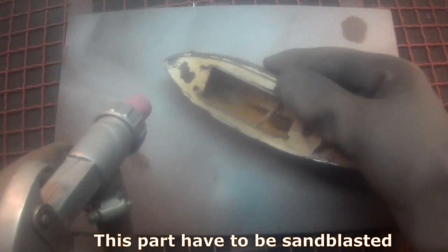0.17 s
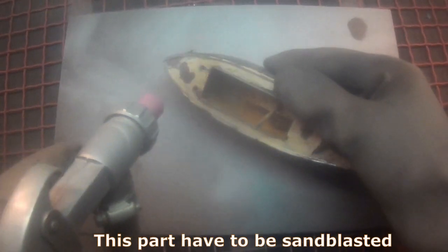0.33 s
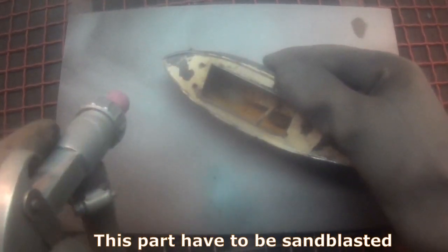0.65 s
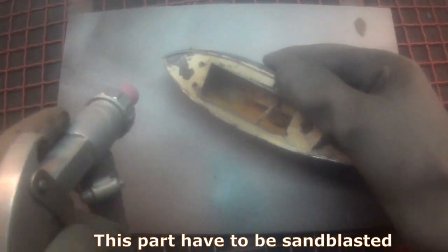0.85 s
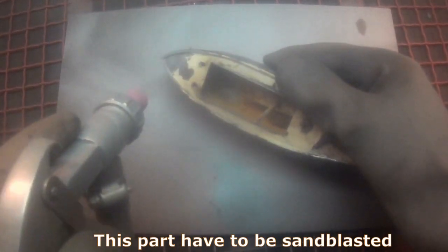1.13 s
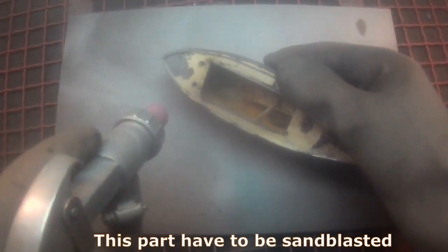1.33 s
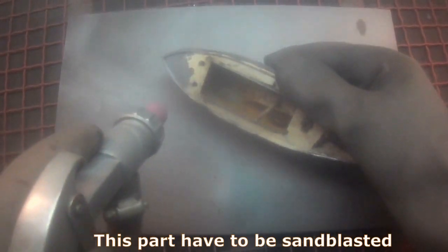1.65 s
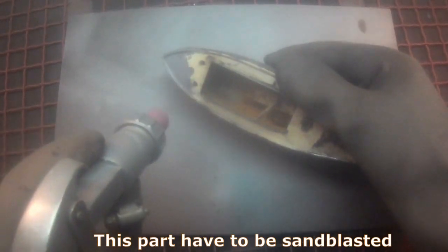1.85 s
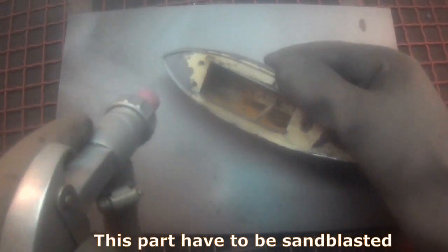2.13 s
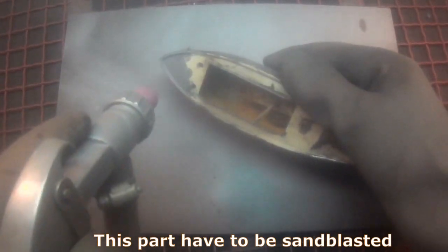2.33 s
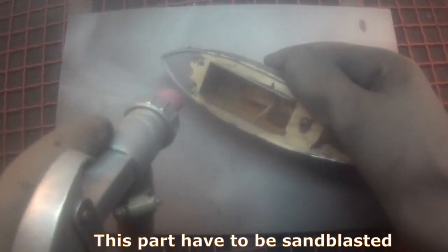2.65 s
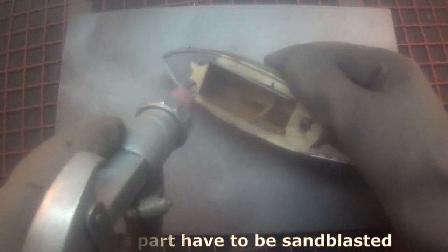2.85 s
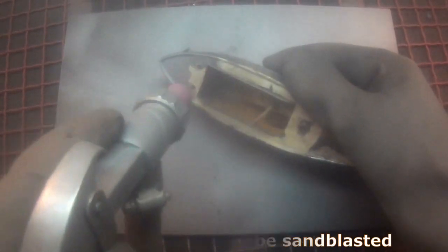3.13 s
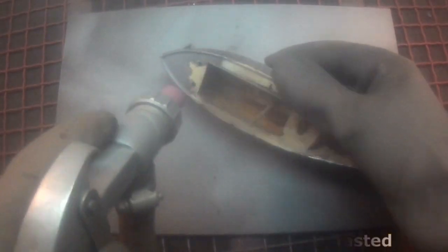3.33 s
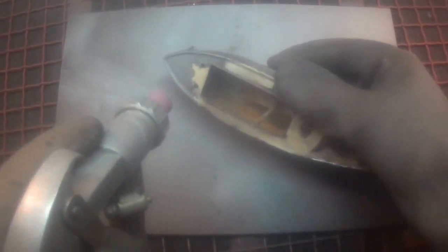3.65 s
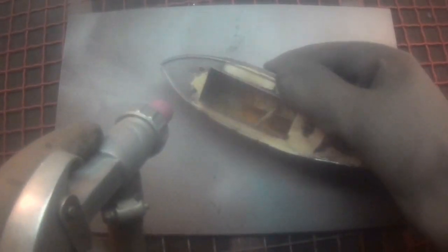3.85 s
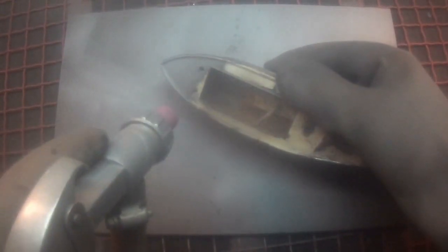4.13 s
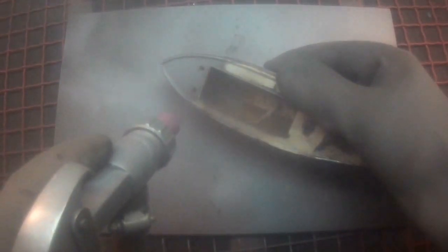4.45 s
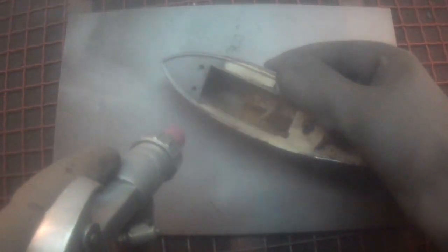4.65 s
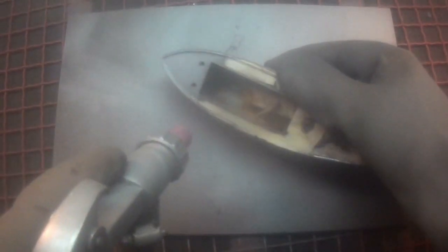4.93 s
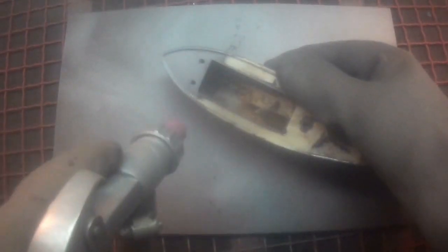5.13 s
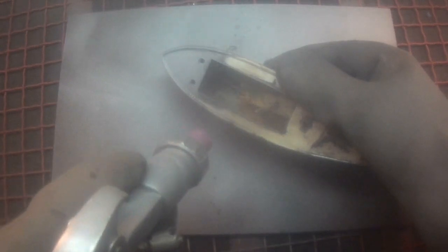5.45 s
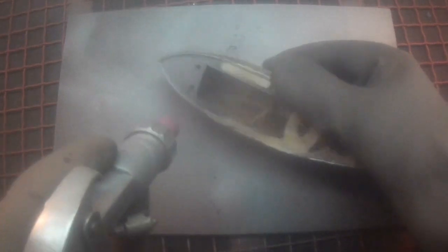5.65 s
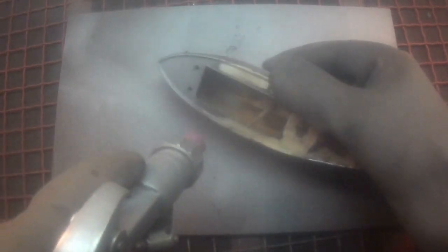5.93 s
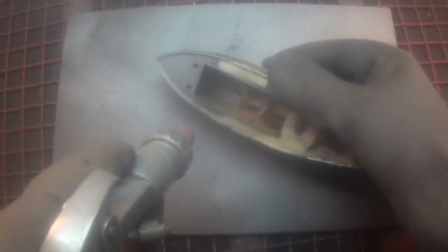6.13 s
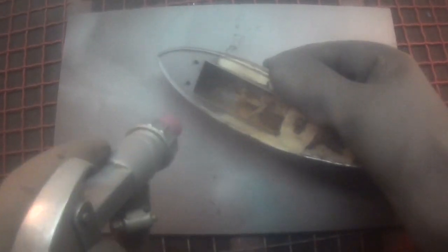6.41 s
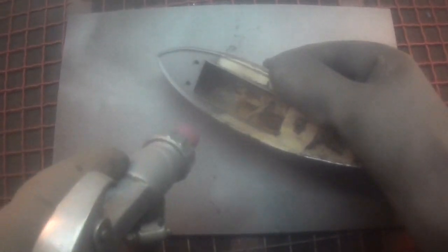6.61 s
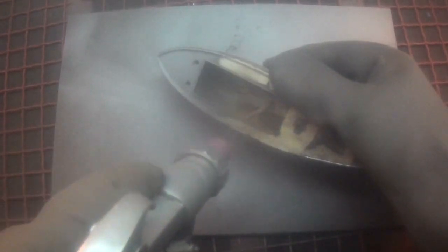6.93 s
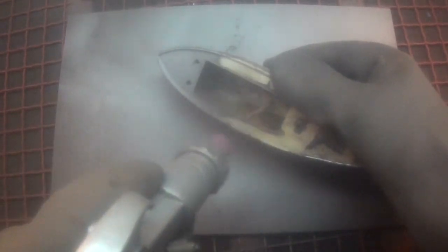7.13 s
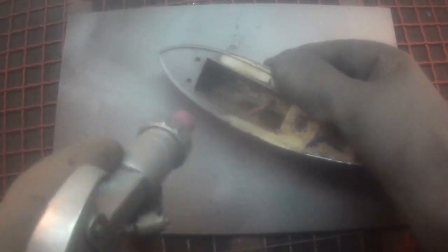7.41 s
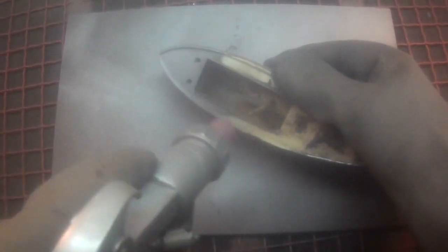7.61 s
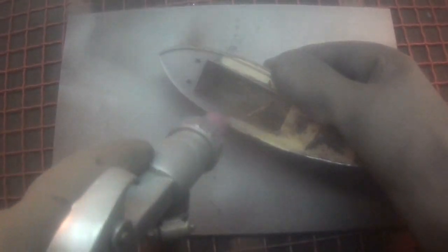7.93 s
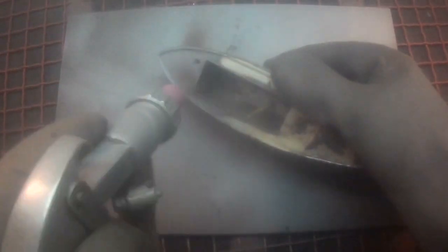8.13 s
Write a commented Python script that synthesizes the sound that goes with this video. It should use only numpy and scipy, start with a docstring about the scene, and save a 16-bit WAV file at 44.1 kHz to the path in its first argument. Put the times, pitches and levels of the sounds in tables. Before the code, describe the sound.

After faint spits of air, a rasping abrasive jet starts and stops repeatedly inside a closed metal cabinet, making a thin metal shell ring and rattle.

```python
"""A thin leak of air spits, then a hissing jet bursts out again and again, rattling and ringing metal close by.
A sandblasting gun strips a small metal hull in a closed cabinet: turbulent air and grain clicks, shaped by the
trigger valve, excite the resonances of hull and cabinet, shared out by the wandering aim. Each throw of the
valve thumps the cabinet's low modes; handling knocks on it. A low rumble and faint whistles, present from the
first opening on, and workshop noise fill the gaps. The sound is mono."""
import sys
import numpy as np
from scipy import signal
from scipy.fft import rfft, irfft, next_fast_len
from scipy.io import wavfile

SR = 44100
rng = np.random.default_rng(int(sys.argv[2]) if len(sys.argv) > 2 else 0)


def wrap_up_sound(samples):
    """Save the sound to the file named by the first command line argument, as 16-bit audio."""
    columns = np.atleast_2d(samples).T
    # keep every value between -1 and 1, then stretch to whole-number steps
    tamed = np.clip(columns, -1, 1)
    steps = np.round(tamed * 32767).astype(np.int16)
    wavfile.write(sys.argv[1], SR, steps)


N = 364707
TIME = np.arange(N) / SR
FREQS = np.fft.rfftfreq(8192, 1 / SR)  # frequency grid of all filters, Hz


def gain_of(db):
    """Logarithmic level: decibels become an amplitude ratio."""
    return 10 ** (np.asarray(db) / 20)


def evened(x):
    """Normalisation: scales a signal to an rms of one."""
    return x / np.sqrt(np.mean(x ** 2) + 1e-20)


def decay(t, t60):
    """Exponential damping: falls by 60 dB in t60 seconds."""
    return np.exp(-np.log(1000) * t / t60)


def add(mix, start_s, sound):
    """Superposition: sums a sound into the mix from a given time."""
    part = mix[max(round(start_s * SR), 0):][:len(sound)]
    part += sound[:len(part)]


def slow_chance(top_hz):
    """Band-limited noise: a random wobble of rms one, no faster than top_hz."""
    size = next_fast_len(N)
    keep = np.fft.rfftfreq(size, 1 / SR) < top_hz
    noise_bins = rfft(rng.standard_normal(size))
    return evened(irfft(noise_bins * keep, size)[:N])


def curve(points):
    """Linear interpolation: a (time, value) table becomes a continuous course."""
    return np.interp(TIME, *np.transpose(points))


def spectrum(points):
    """Spectral envelope: gain per frequency, interpolated in dB over log frequency."""
    hz, db = np.transpose(points)
    return gain_of(np.interp(np.log(FREQS + 1), np.log(hz), db))


def resonances(modes):
    """Modal response: the powers of steep-sided resonance peaks add up."""
    power = 0
    for hz, width_hz, db in modes:
        peak = gain_of(db) / (1 + (2 * (FREQS - hz) / width_hz) ** 2)
        power = power + peak ** 2
    return np.sqrt(power)


def ring(x, gain):
    """Minimum phase: a causal filter of unit energy, so that resonances ring on after their cause."""
    log_gain = np.log(np.maximum(gain / gain.max(), 1e-5))
    circle = np.concatenate([log_gain, log_gain[-2:0:-1]])
    # the Hilbert transform of the log gain supplies the minimum phase
    response = np.exp(np.conj(signal.hilbert(circle)))[:len(gain)]
    taps = irfft(response)[:len(gain)]
    return signal.oaconvolve(x, taps / np.linalg.norm(taps))[:N]


def muffle(x, top_hz, order):
    """Low-pass filtering: attenuates everything above top_hz."""
    return signal.sosfilt(signal.butter(order, top_hz, fs=SR, output="sos"), x)


# workshop noise spectrum: pitch_hz [Hz], level_db [relative dB per Hz]
ROOM_SPECTRUM = [(20, -0.5), (60, -7), (160, -5), (260, -10.5), (700, -14.5), (2600, -24.5), (5000, -33),
                 (15000, -44)]
# low rumble, spectrum: pitch_hz [Hz], level_db [relative dB per Hz]
RUMBLE_SPECTRUM = [(20, 0), (70, -15), (120, -1), (165, 5), (230, -6.5), (320, -6), (600, -12),
                   (1500, -31)]
# course of that rumble: time_s [s], level_db [dB]
RUMBLE_LEVEL = [(0.2,-75),(1.1,-75.5),(1.45,-82),(1.95,-75.5),(2.65,-82),(3.4,-76),(4.3,-92),(5.2,-78),(6.1,-79),(6.8,-91),(7.25,-77),(8.2,-88)]
# whistles of the leaking valve: pitch_hz [Hz], level_db [dB, mean of a random wobble]
LEAK_WHISTLES = [(2396, -98.5), (4258, -92), (4770, -101), (8312, -95.5), (11999, -99)]


def background(room_db=-80, waver_hz=12, unsteady_db=3):
    """Stationary noise and frequency modulation: workshop, low rumble and wavering valve whistles."""
    room = gain_of(room_db) * ring(rng.standard_normal(N), spectrum(ROOM_SPECTRUM))
    rumble = gain_of(curve(RUMBLE_LEVEL)) * ring(rng.standard_normal(N), spectrum(RUMBLE_SPECTRUM))
    drift = np.cumsum(waver_hz * slow_chance(60)) / SR  # cycles, common to all whistles
    leak = np.zeros(N)
    for hz, db in LEAK_WHISTLES:
        level = gain_of(db + unsteady_db * slow_chance(2))
        leak += level * np.sin(2 * np.pi * (hz * TIME + drift))
    first_opening = VALVE_SPANS[0][0]
    return room + (rumble + leak) * (TIME > first_opening)


# dull knocks of gun and hull being handled: start_s [s], level_db [relative dB]
HANDLING_KNOCKS = [(0.329, -66), (0.774, -55), (1.878, -64), (2.029, -54), (2.149, -51.5), (2.996, -48),
                   (3.558, -52), (3.829, -55.5), (4.946, -49.5), (5.191, -52.5), (5.329, -59), (5.44, -60),
                   (6.141, -47.5), (6.247, -52.5), (7.234, -63), (7.342, -51.5), (7.552, -45),
                   (7.638, -51.5)]


def knocks(rattle_db=-8, swell_s=.012, lead_s=0.0087, push_db=-8, top_hz=200):
    """Impact excitation: a soft push and a short rattle set the cabinet booming."""
    t = np.arange(SR // 4) / SR
    rattle, push = np.zeros(N), np.zeros(N)
    push_wave = np.exp(-t / swell_s) * np.sin(2 * np.pi * CABINET_MODES[1][0] * t)
    for start_s, level_db in HANDLING_KNOCKS:
        # the rattle swells to its peak after swell_s, then dies away
        add(rattle, start_s - lead_s, gain_of(level_db) * t / swell_s * np.exp(1 - t / swell_s))
        add(push, start_s, gain_of(level_db + push_db) * push_wave)
    boom = resonances([(80, 91, -8), (136, 24, -2), (164, 43, -1.0), (288, 92, -12), (533, 330, -22.5)])
    booming = ring(rattle * rng.standard_normal(N), boom)
    return gain_of(rattle_db) * booming + muffle(push, top_hz, order=4)


# low modes of the cabinet: pitch_hz [Hz], level_db [relative dB], t60_s [s]
CABINET_MODES = [(51.6,-11,0.5),(71.3,1,.16),(106.7,-6.5,0.17),(136,-6,0.37),(172.5,16,0.12)]


def thumps(open_db=-56, shut_db=-57.0, top_hz=124, lead_s=0.0033,
           shudder_db=-10, shudder_t60=0.32, shudder_top_hz=195):
    """Modal impulse response: opening pushes the cabinet's air, shutting pulls; hose and panels shudder."""
    t = np.arange(SR // 2) / SR
    thump = sum(gain_of(db) * decay(t, t60) * np.cos(2 * np.pi * hz * t) for hz, db, t60 in CABINET_MODES)
    air, shake = np.zeros(N), np.zeros(N)
    for opens, shuts, _ in VALVE_SPANS:
        for start_s, push in (opens, gain_of(open_db)), (shuts, -gain_of(shut_db)):
            add(air, start_s - lead_s, push * thump)
            add(shake, start_s - lead_s, abs(push) * decay(t, shudder_t60))
    shudder_modes = resonances([(40, 65, 0.5), (90, 47, -5.5), (156, 52, 2)])
    shudder = gain_of(shudder_db) * ring(shake * rng.standard_normal(N), shudder_modes)
    return muffle(air, top_hz, order=6) + muffle(shudder, shudder_top_hz, order=6)


def grit(flow, grains_per_s=7000, share=0.48):
    """Shot noise: clicks of single grains, mixed by power with turbulent air."""
    clicks = rng.standard_normal(N) * (rng.random(N) < grains_per_s / SR)
    share = np.clip(share, 0, 1)
    return flow * (np.sqrt(share) * evened(clicks) + np.sqrt(1 - share) * rng.standard_normal(N))


# squeezes of the trigger: start_s (valve opens) [s], end_s (valve shuts) [s], level_db (air pressure) [dB]
VALVE_SPANS = [(0.208, 0.594, 2), (0.683, 0.863, 3), (0.929, 1.143, 2.3), (1.184, 1.601, 1.8),
               (1.661, 2.019, 1.5), (2.093, 2.306, 0.8), (2.371, 2.997, -0.7), (3.071, 3.43, -0.5),
               (3.509, 3.682, -0.5), (3.77, 4.726, -0.95), (4.801, 5.019, -0.5), (5.105, 5.724, -0.2),
               (5.791, 6.032, -0.26), (6.095, 6.282, 0.5), (6.381, 7.393, -0.13), (7.474, 7.724, -1.8),
               (7.782, 8.122, -3.5), (8.218, 8.301, -1.5)]
SURGE_DB, SURGE_S = 1.5, 0.053  # pressure stored in the hose gives each blast a stronger start


def airflow(spans, rise_s=0.0042, fall_t60=0.037):
    """Pressure discharge: a fast rise with a surge settles, then bleeds out once the valve shuts."""
    flow = np.zeros(N)
    for opens, shuts, pressure_db in spans:
        length = shuts - opens
        t = np.arange(0, length + 2 * fall_t60, 1 / SR)
        pressure = gain_of(pressure_db + SURGE_DB * np.exp(-t / SURGE_S))
        bleed = decay(np.maximum(t - length, 0), fall_t60)
        add(flow, opens, pressure * np.minimum(t / rise_s, 1) * bleed)
    return flow


# small spits of air before the first blast: start_s [s], end_s [s], level_db [dB, before the surge]
AIR_SPITS = [(0.034,.056,-78),(.069,.097,-82),(.135,.175,-78.5)]


def spits():
    """Leakage flow: a little air sounds the hull before the trigger is fully pressed."""
    hull = resonances([(2400, 670, 2.5), (3500, 500, -3), (6640, 1500, -15)])
    return ring(grit(airflow(AIR_SPITS)), hull + gain_of(-21) * spectrum(JET_SPECTRUM))


# short gulps of grit: start_s [s], end_s [s], level_db [dB, before the surge]
GRIT_GULPS = [(0.685,.74,-59),(1.11,1.145,-64)]


def gulps():
    """Burst excitation: a clump of grit leaves the nozzle and sounds the panels."""
    return ring(grit(airflow(GRIT_GULPS)), resonances(PANEL_MODES))


# resonances the jet catches only from certain angles:
# start_s [s], end_s [s], pitch_hz [Hz], width_hz [Hz], level_db [dB, before flow and wobble]
CAUGHT_MODES = [(0.031,1.35,518,94,-79),(1.5,2.23,516,56,-79),(2.67,3.63,513,110,-78.5),(6.91,7.9,1130,59,-66),(1.4,2.3,8480,330,-64),(3.7,4.7,7000,300,-58),
                (4.4,6.8,3570,97,-54.5),(6.5,8.2,6700,150,-58),(6.8,8,2740,180,-48),(6.8,9,3700,110,-55.5),(4.42,8.3,2635,62,-50),(0.42,1.8,2635,94,-60.5)]


def caught(flow, fade_s=0.26, patchy_db=2.4, patchy_hz=9):
    """Selective excitation: single modes swell, waver and sink as the jet sweeps over spots that feed them."""
    out = np.zeros(N)
    for start_s, end_s, hz, width_hz, db in CAUGHT_MODES:
        fade = np.clip(np.minimum(TIME - start_s, end_s - TIME) / fade_s, 0, 1)
        swell = fade * gain_of(db + patchy_db * slow_chance(patchy_hz))
        out += ring(flow * swell * rng.standard_normal(N), resonances([(hz, width_hz, 0)]))
    return out


def afterring(x, db=-27, t60=0.15, top_hz=4000):
    """Reverberation: the steel walls hold a faint, dull tail after each blast."""
    t = np.arange(SR // 4) / SR
    tail = rng.standard_normal(len(t)) * decay(t, t60)
    tail = muffle(tail / np.linalg.norm(tail), top_hz, order=1)
    return gain_of(db) * signal.oaconvolve(x, tail)[:N]


def echoes(t60):
    """Diffuse reflection: frequency response of a dense cluster of short echoes."""
    t = np.arange(len(FREQS)) / SR
    taps = rng.standard_normal(len(t)) * decay(t, t60)
    return rfft(taps / np.linalg.norm(taps), 2 * len(t) - 2)


# hiss of the nozzle: pitch_hz [Hz], level_db [relative dB per Hz]
JET_SPECTRUM = [(300,-40),(700,-39),(3000,-12.5),(4500,-6.5),(6800,-3.5),(7050,-4.5),(7300,-0.5),(7700,-2.5),(8500,-4),(8800,-10),(10900,-3),(12400,-2),(14300,-2.5),(15200,-17)]


def nozzle(x, wall_db=-9, wall_t60=0.054, hand_db=-9, hand_t60=0.0069, count=9):
    """Comb filtering: wall reflections of the hiss stay put, those off hull and glove shift as they move."""
    walls = 1 + gain_of(wall_db) * echoes(wall_t60)
    place = np.linspace(0, count - 1, N)
    out = np.zeros(N)
    for k in range(count):  # crossfade through successive sets of nearby reflections
        nearness = np.cos(np.pi / 2 * np.minimum(abs(place - k), 1))
        comb = abs(walls + gain_of(hand_db) * echoes(hand_t60))
        out += ring(grit(x * nearness), spectrum(JET_SPECTRUM) * comb)
    return out


# how squarely the jet meets the hull as the hand moves: time_s [s], contact_db [dB]
AIM_CONTACT = [(0.205,-5.5),(0.23,-1.5),(0.3,-10.5),(0.48,-4),(0.7,-8),(0.98,-3),(1.04,-9),(1.68,-10),(1.79,0.5),(1.97,-1),(2.11,-4),(2.46,-4.5),(2.66,-1.4),
               (2.84,-1.5),(2.88,6),(3.24,-3.5),(3.3,4),(3.65,4.5),(3.8,-1),(3.94,-4.5),(3.98,2),(4.03,-5.5),(4.36,2),(4.45,-1.5),(4.62,-1.5),(4.68,3.5),(4.92,5),
               (5.29,1),(5.37,-2.5),(5.8,-3),(5.86,3.5),(6.26,2.5),(6.64,0),(7.03,-4.5),(7.07,4.5),(8.25,0.5)]
# what the spot under the jet feeds, at even contact:
# time_s [s], panels_db (cabinet) [dB], hollow_db (hull) [dB], rim_db (hull) [dB]
SPOT_LEVELS = [(0.23,-62,-44.5,-47),(0.95,-64.5,-46.5,-47.5),(1.35,-66.5,-45,-45.5),(1.85,-69.5,-47.5,-46.5),(2.3,-66,-46,-47.5),(3.53,-64,-44.5,-48.5),
               (3.86,-68,-46.5,-44),(4.9,-67.5,-45.5,-46.5),(6.6,-66.5,-48,-49.5),(7.25,-73.5,-46.5,-53),(7.4,-66.5,-43.5,-54.5),(8.11,-63.5,-41,-51.5),(8.25,-67.5,-43.5,-46)]
JET_DB = -49  # the free jet at even contact
JET_FOLLOWS, PANELS_FOLLOW = 0.24, 0.79  # dB per dB of contact; the hull follows it fully
TREMOR_DB, TREMOR_HZ = 1, 12  # the hand never holds the aim still


def excitation():
    """Coupling: gains of panels, hollow, rim and jet rise with contact; the spot shares out the ringing."""
    contact = curve(AIM_CONTACT) + TREMOR_DB * slow_chance(TREMOR_HZ)
    time_s, *levels = np.transpose(SPOT_LEVELS)
    panels, hollow, rim = (np.interp(TIME, time_s, db) for db in levels)
    jet = JET_DB + JET_FOLLOWS * contact
    return gain_of([panels + PANELS_FOLLOW * contact, hollow + contact, rim + contact, jet])


# resonances of cabinet panels, hull hollow and hull rim: pitch_hz [Hz], width_hz [Hz], level_db [relative dB]
PANEL_MODES = [(582,310,-17),(817.6,76,-5),(954,62,-4),(1112.5,49,-0.5),(1272,93,-3),(1432,40,-4.5),(1558,250,-5)]
HOLLOW_MODES = [(1794,108,-18),(1890,48,-8.5),(1954,103,-11.5),(2070,136,-7),(2240,236,-16),(2387,67,-8),(2466,115,-12),(2609,104,-1),(2747,120,-9),(2815,45,-10)]
RIM_MODES = [(3030, 133, -10.5), (3160, 150, -11), (3400, 110, -6.5), (3574, 99, -0.5), (3730, 70, -7),
             (4020, 160, -13), (4216, 200, -12), (4404, 66, -3), (4670, 260, -9), (5060, 140, -9.5),
             (5350, 106, -11.5), (5530, 56, -10.5), (5830, 120, -11), (6174, 330, -11.5), (6480, 260, -17),
             (6720, 85, -9.5)]


def blast(flow, flutter_db=-0.06, flutter_hz=45, bounce_db=0.45, bounce_hz=40):
    """Forced vibration: the unevenly fed jet hisses and drives panels, hollow and rim."""
    panels, hollow, rim, jet = excitation()
    feed = flow * gain_of(flutter_db * slow_chance(flutter_hz))
    impact = feed * gain_of(bounce_db * slow_chance(bounce_hz))  # the jet flaps across the hull's edge
    hiss = nozzle(feed * jet)
    hull = ring(grit(impact * hollow), resonances(HOLLOW_MODES))
    edge = ring(grit(impact * rim), resonances(RIM_MODES))
    box = ring(grit(feed * panels), resonances(PANEL_MODES))
    return hiss + hull + edge + box


def scene():
    """Superposition: every source reaches one microphone, heard alike in both channels."""
    flow = airflow(VALVE_SPANS)
    blasting = blast(flow) + caught(flow) + gulps()
    mono = background() + knocks() + thumps() + spits() + afterring(blasting) + blasting
    return np.array([mono, mono])


def record(dry, edge_hz=15450):
    """Band limitation: a linear-phase low-pass sets the recorder's upper edge."""
    lowpass = signal.firwin(301, edge_hz, window=("kaiser", 8), fs=SR)
    return signal.oaconvolve(dry, lowpass[None], "same", axes=1)


dry = scene()
out = record(dry)
wrap_up_sound(out)
```